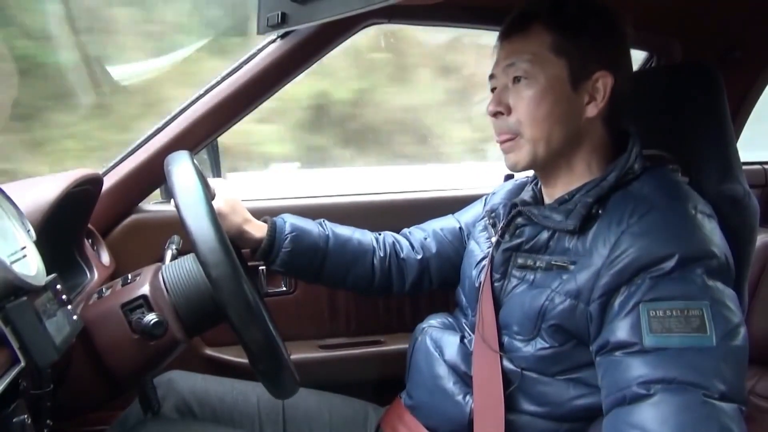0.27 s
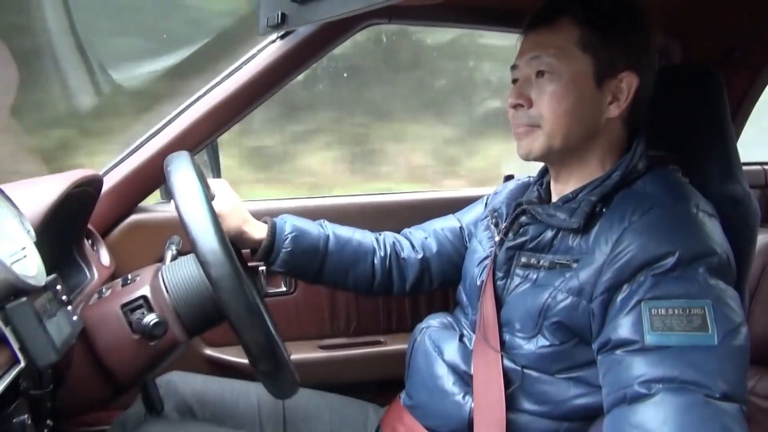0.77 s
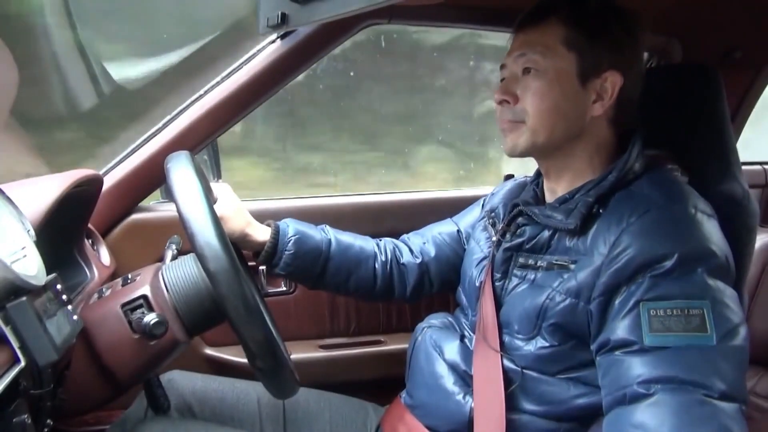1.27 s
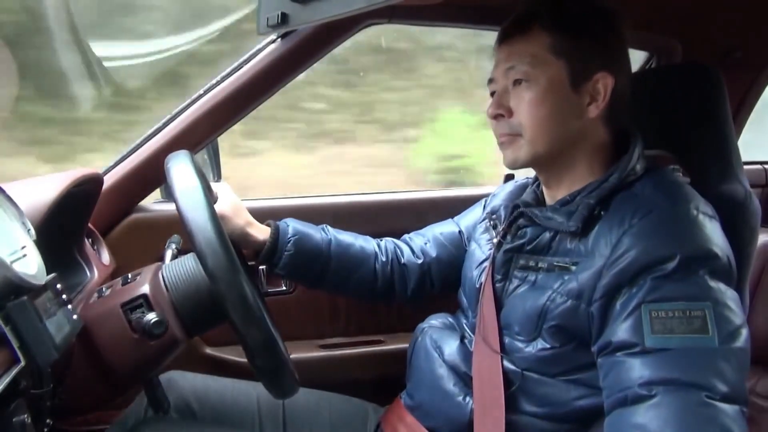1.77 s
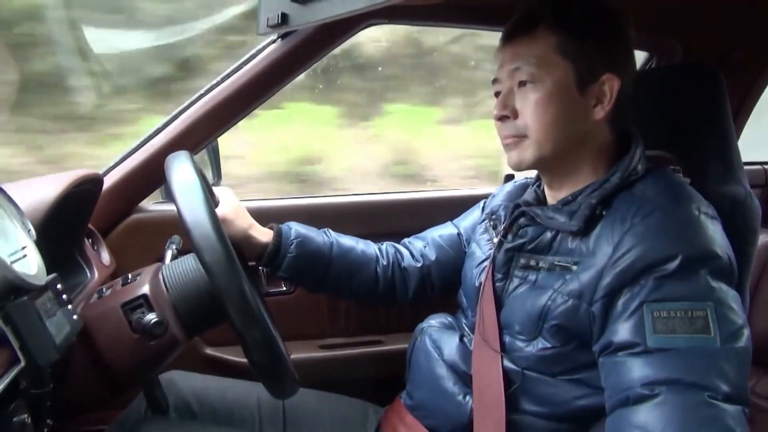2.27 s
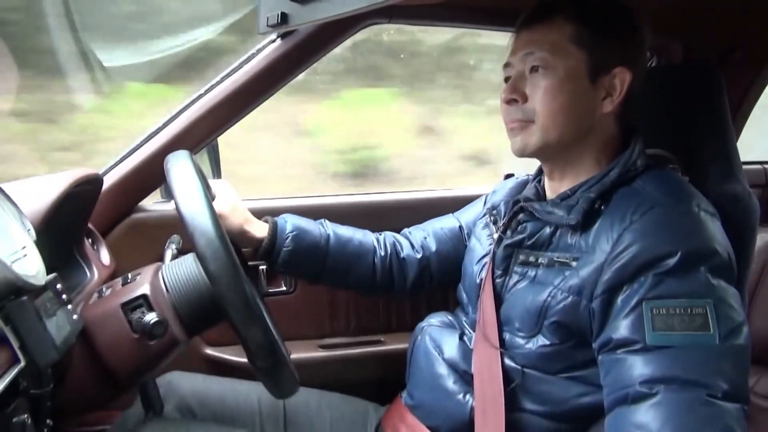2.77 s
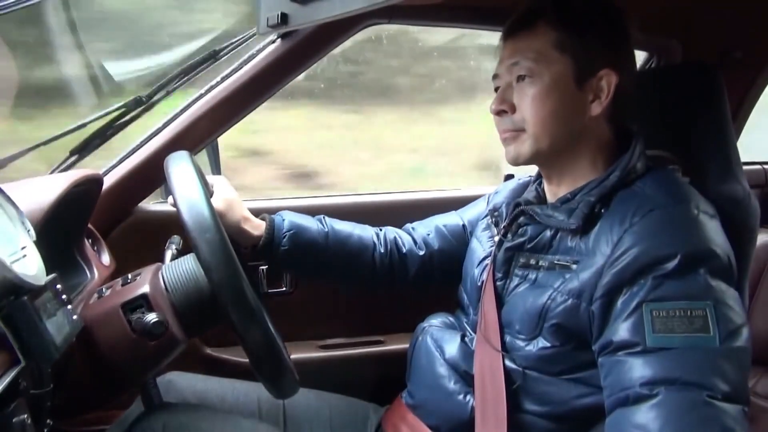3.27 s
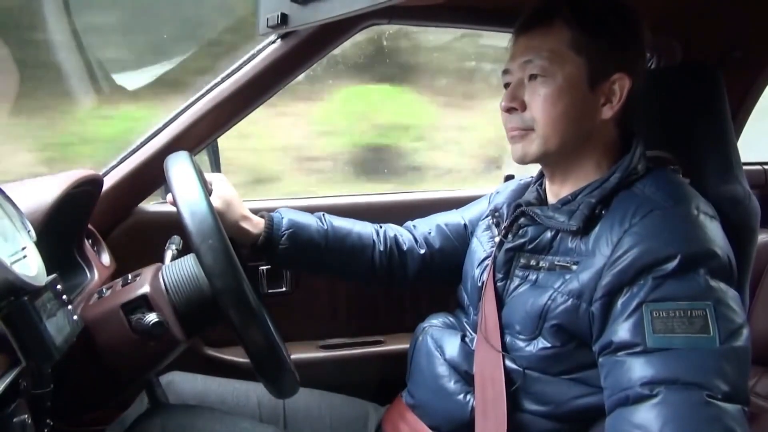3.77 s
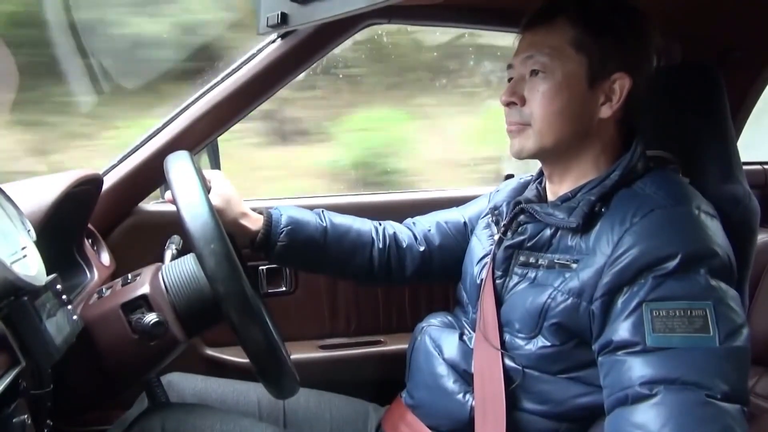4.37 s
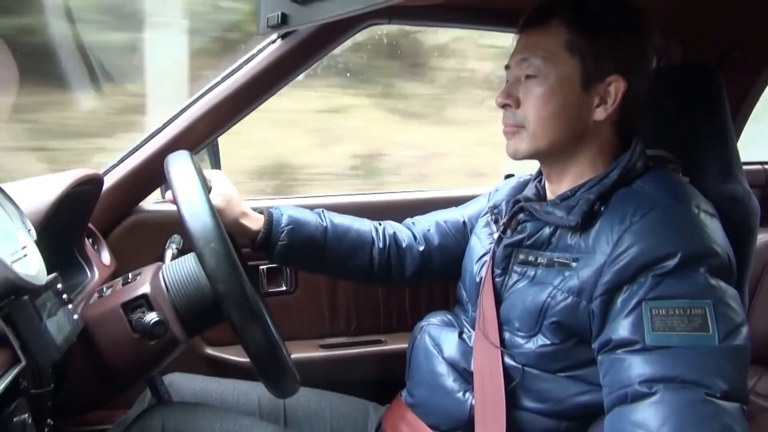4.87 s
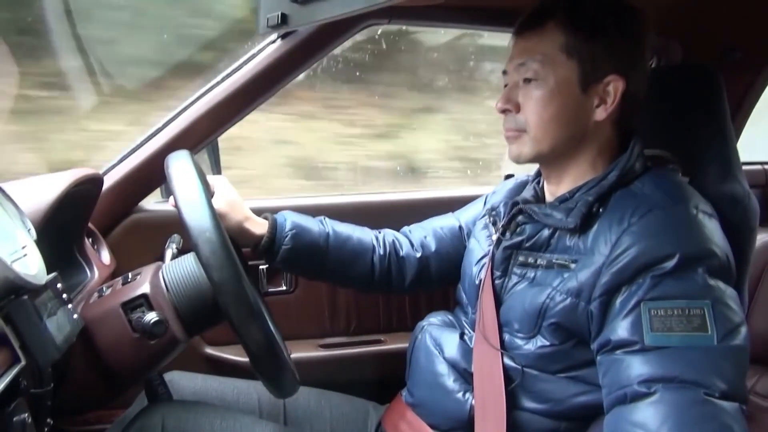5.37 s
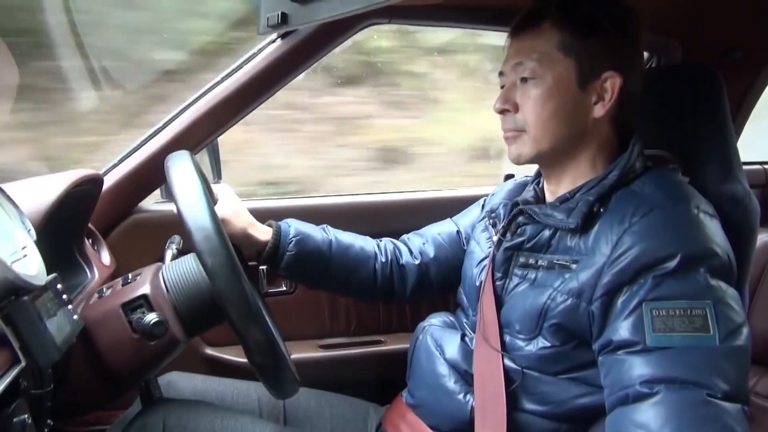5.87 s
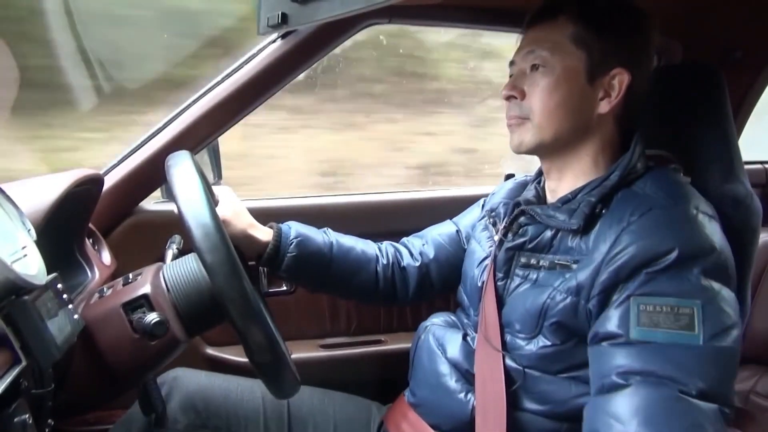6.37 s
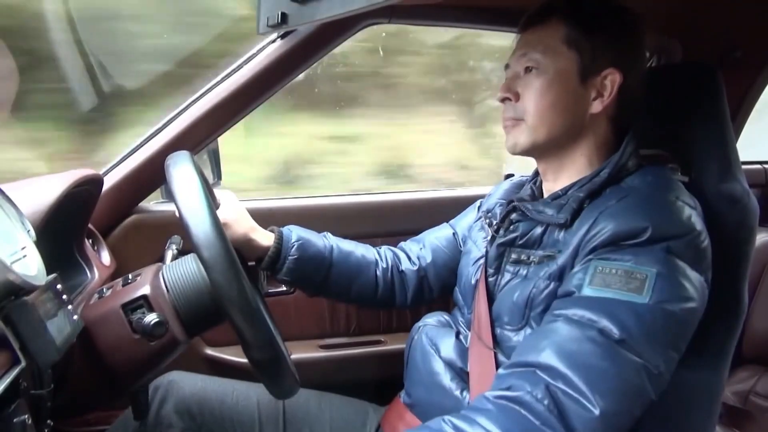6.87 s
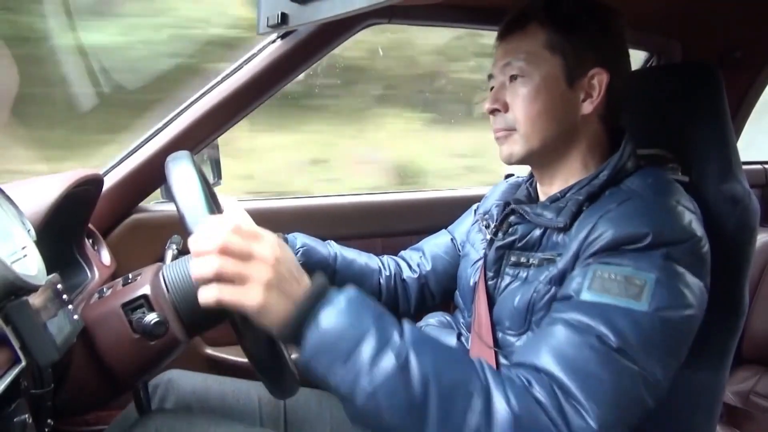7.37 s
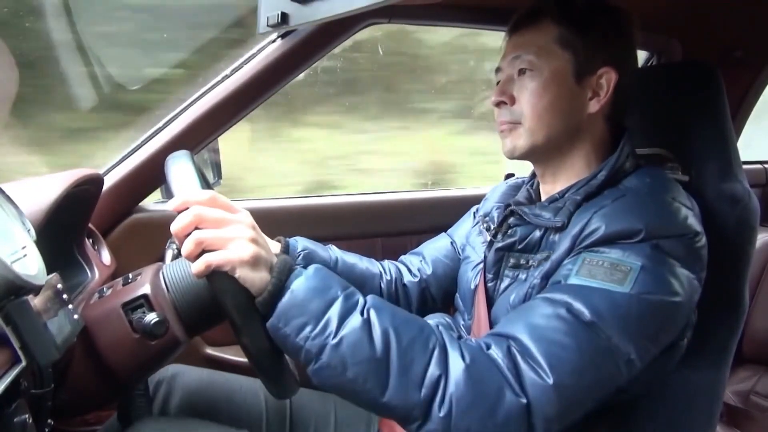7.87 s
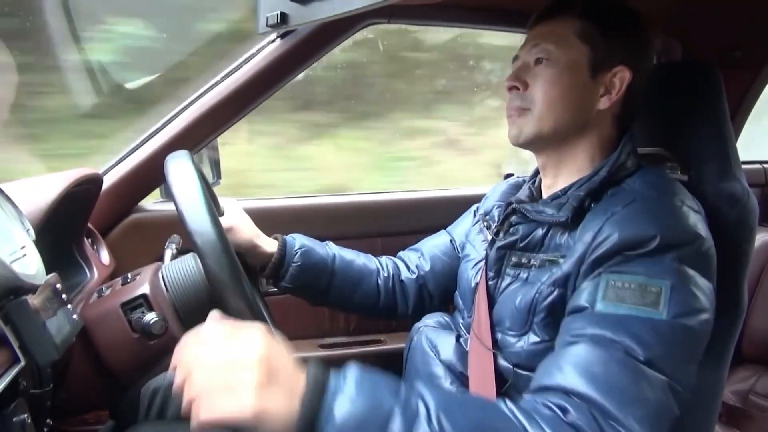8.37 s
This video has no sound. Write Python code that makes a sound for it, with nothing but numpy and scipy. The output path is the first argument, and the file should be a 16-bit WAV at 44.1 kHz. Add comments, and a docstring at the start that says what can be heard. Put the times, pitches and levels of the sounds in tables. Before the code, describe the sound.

Inside a car cabin, a turbocharged rotary engine booms and slowly rises, lifts off with a fluttering turbo and a jolt, then resumes lower and quieter.

```python
"""Turbocharged rotary car, cabin view

A booming, slowly rising firing note over road rumble and growing intake hiss: phase-locked orders plus shaped noise.
The throttle shuts, the turbo flutters in noise puffs, the drivetrain judders twice as short deep sines,
and the engine picks up at lower speed. The bass overloads the microphone amplifier, which chops the hiss at crests.
"""
import sys
import numpy as np
from scipy import signal
from scipy.fft import rfft, irfft
from scipy.io import wavfile

SR = 44100
rng = np.random.default_rng(int(sys.argv[2]) if len(sys.argv) > 2 else 0)


def file_out(sig):
    """Save sig as 16-bit WAV at sys.argv[1]."""
    # one column per channel
    cols = np.atleast_2d(sig).T
    # limit, then scale
    lim = np.clip(cols, -1, 1)
    pcm = np.round(lim * 32767).astype(np.int16)
    wavfile.write(sys.argv[1], SR, pcm)


N = 381024

# gear change: lift off, clutch bites, clutch holds, ease off again
LIFT_S, BITE_S, HOLD_S, EASE_S = 6.42, 7.05, 7.2, 7.6
# time constant of the boost loss after the lift
BLEED_S = 0.37


def amp(db):
    """Decibels to gain."""
    return 10 ** (np.asarray(db) / 20)


def unit(x):
    """Scale to rms 1."""
    return x / np.sqrt(np.mean(x ** 2) + 1e-20)


def since(start_s):
    """Seconds elapsed since the given moment, zero before it."""
    return np.maximum(np.arange(N) / SR - start_s, 0)


def curves(rows):
    """Each column of a table, joined by straight lines at every sample."""
    t_s, *columns = np.transpose(rows)
    return [np.interp(np.arange(N) / SR, t_s, column) for column in columns]


def noise(spectrum):
    """Noise of rms 1, coloured by a spectrum table on a log frequency axis."""
    hz, db = np.transpose(spectrum)
    bins_hz = np.fft.rfftfreq(N, 1 / SR)
    gain = amp(np.interp(np.log(bins_hz + 1), np.log(hz + 1), db))
    return unit(irfft(rfft(rng.standard_normal(N)) * gain, N))


def band(hz, width_hz):
    """Noise of rms 1 in one resonance; at 0 Hz it is a slow wander."""
    detune = 2 * (np.fft.rfftfreq(N, 1 / SR) - hz) / width_hz
    return unit(irfft(rfft(rng.standard_normal(N)) / (1 + detune ** 2), N))


def arch(start_s, length_s):
    """Half sine that swells and fades over the given stretch."""
    part = (np.arange(N) / SR - start_s) / length_s
    return np.maximum(np.sin(np.pi * np.clip(part, 0, 1)), 0)


def fuzzy_tone(start_s, end_s, hz, width_hz, db):
    """Narrow noise band that comes and goes."""
    return amp(db) * arch(start_s, end_s - start_s) * band(hz, width_hz)


# body rumble: t/s, level/dB
RUMBLE_LEVEL = [(0, -18.5), (1.2, -16), (1.6, -20.5), (5.6, -21), (6.4, -17), (8.64, -16)]
# body rumble spectrum: f/Hz, relative level/dB
RUMBLE_SPECTRUM = [(5, -20.5), (12, -5.5), (22, -1.5), (34, 6), (45, -1), (60, -2.5), (78, -10),
                   (110, -15.5), (200, -66.5)]
# tyre spectrum: f/Hz, relative level/dB
TYRE_SPECTRUM = [(50, -13.5), (95, 0.5), (140, 1), (200, -1), (280, -10), (420, -9.5), (560, -18),
                 (850, -22), (1150, -19.5), (1700, -30), (2400, -37), (5000, -49.5), (10800, -49)]
# tyre level at the start, and its growth until the lift
TYRE_DB, TYRE_DB_PER_S = -31, 0.41


def road(grain_db=0.6):
    """Body rumbles on its springs; tyres roll over coarse asphalt, louder as the car gains speed."""
    rumble_db, = curves(RUMBLE_LEVEL)
    tyre_db = TYRE_DB + TYRE_DB_PER_S * np.minimum(since(0), LIFT_S)
    rumble = amp(rumble_db) * noise(RUMBLE_SPECTRUM)
    tyres = amp(tyre_db + grain_db * band(0, 110)) * noise(TYRE_SPECTRUM)
    return rumble + tyres


# road bumps and drivetrain judder: start t/s, length/s, f/Hz, peak level/dB
JOLTS = [(.98, .085, 18, -4), (1.085, .05, 28, -9), (1.143, .03, 17, -2.5), (1.2, .13, 26, -14),
         (6.503, .17, 33.8, -2), (7.07, .13, 36, -2)]


def jolts():
    """Deep swings of the whole car, which start and stop quickly."""
    out = np.zeros(N)
    for start_s, length_s, hz, peak_db in JOLTS:
        swing = np.sin(2 * np.pi * hz * (np.arange(N) / SR - start_s))
        out += amp(peak_db) * np.sqrt(arch(start_s, length_s)) * swing
    return out


# loudest trim rattles: t/s, onset level/dB, f/Hz
TICKS = [(.463, -42, 5500), (6.775, -35.5, 12000), (7.235, -46, 11000), (7.745, -46, 7024),
         (7.868, -45, 5000), (8.182, -43, 9000)]
# short trim squeak: start t/s, end t/s, f/Hz, width/Hz, level/dB
SQUEAK = (6.03, 6.15, 2400, 90, -49)
# fainter random rattles: mean onset level, half range, pitch range
RATTLE_DB, RATTLE_SPREAD_DB, RATTLE_LOW_HZ, RATTLE_HIGH_HZ = -48, 2.5, 4400, 11000


def trim(t60_s=0.071, relative_width=1.0, faint_count=14):
    """Loose fittings tick as decaying noise bands, a few loudly and more of them faintly; one squeaks."""
    ticks = list(TICKS)
    for when, force, pitch in rng.random((faint_count, 3)):
        db = RATTLE_DB + RATTLE_SPREAD_DB * (2 * force - 1)
        hz = RATTLE_LOW_HZ + (RATTLE_HIGH_HZ - RATTLE_LOW_HZ) * pitch
        ticks.append((when * N / SR, db, hz))
    out = fuzzy_tone(*SQUEAK)
    for start_s, db, hz in ticks:
        age_s = np.arange(N) / SR - start_s
        decay = (age_s > 0) * np.exp(-np.log(1000) * abs(age_s) / t60_s)
        out += amp(db) * decay * band(hz, hz * relative_width)
    return out


# intake air spectrum: f/Hz, relative level/dB
HISS_SPECTRUM = [(700, -6.5), (1500, -3), (2400, -5.5), (2950, -1.5), (3350, 0), (3750, -1), (4300, -6.5),
                 (5400, -7.5), (7200, -5.5), (8200, -7.5), (9300, -4.5), (10900, -6.5), (12200, -8.5),
                 (15800, -11)]
# air singing at edges in the intake: start t/s, end t/s, f/Hz, width/Hz, level/dB
WHISTLES = [(-.8, 2.9, 6650, 140, -59), (1.1, 2.5, 7820, 200, -59), (2.3, 4, 7250, 200, -56.5),
            (3, 4.9, 8720, 200, -57), (-1.8, 7, 3320, 240, -50.5), (2.6, 4.4, 3700, 200, -53.5),
            (6.38, 6.56, 2900, 700, -46), (6.4, 8.3, 3280, 300, -56)]
# turbo spools up to its limit, loses boost at the lift, dies away while coasting
AIR_DB, SPOOL_DB_PER_S, FULL_BOOST_DB = -49.5, 2, -39
BLEED_DB, COAST_DB_PER_S = 15, 5.5


def intake(firings, throb=0.19, flicker_db=0.83):
    """Air rushes through turbo and pipes as boost builds and bleeds away, pulsing slightly with the ports."""
    boost_db = np.minimum(AIR_DB + SPOOL_DB_PER_S * since(0), FULL_BOOST_DB)
    bleed_db = BLEED_DB * (1 - np.exp(-since(LIFT_S) / BLEED_S))
    air_db = boost_db - bleed_db - COAST_DB_PER_S * since(EASE_S)
    rush = noise(HISS_SPECTRUM) * amp(air_db + flicker_db * band(0, 110))
    whistles = sum(fuzzy_tone(*row) for row in WHISTLES)
    return (rush + whistles) * (1 + throb * np.sin(2 * np.pi * firings))


# surge puff spectrum: f/Hz, relative level/dB
PUFF_SPECTRUM = [(600, 8), (2000, 2), (3400, -4), (5000, -10), (6700, -4.5), (7550, 3), (8300, -3),
                 (10800, -5), (13000, -6), (15800, -3.5)]
# compressor surge: centre of first puff, even spacing, puff length, first level, loss per puff
SURGE_S, PUFF_GAP_S, PUFF_S, PUFF_DB, PUFF_FADE_DB = 6.43, .0703, 0.073, -33.5, 1.35


def flutter(count=8):
    """Trapped boost escapes backwards through the compressor in evenly spaced, fading puffs."""
    envelope = np.zeros(N)
    for k in range(count):
        start_s = SURGE_S + k * PUFF_GAP_S - PUFF_S / 2
        envelope += amp(PUFF_DB - k * PUFF_FADE_DB) * arch(start_s, PUFF_S) ** 2
    return noise(PUFF_SPECTRUM) * envelope


def random_reverb(x, t60_s=0.1, wet=.3):
    """Short random decaying reverb, mixed in weakly, roughens the hiss spectrum."""
    t_s = np.arange(SR // 10) / SR
    tail = rng.standard_normal(len(t_s)) * np.exp(-np.log(1000) * t_s / t60_s)
    return x + wet * signal.oaconvolve(x, tail / np.linalg.norm(tail))[:N]


# pull: the firing rate climbs ever faster until the lift
START_HZ, CLIMB_HZ_PER_S, CLIMB_HZ_PER_S2 = 93.95, 3.6, .262
# run-down time constant of the free engine, rate in the next gear, slowing while coasting
RUN_DOWN_S, NEXT_GEAR_HZ, SAG_HZ_PER_S = 1.5, 99.3, 5.5


def clutch():
    """How firmly the next gear holds the engine, from 0 to 1."""
    return np.minimum(since(BITE_S) / (HOLD_S - BITE_S), 1)


def firing_rate():
    """Engine climbs under power, runs down freely, and is caught by the next gear."""
    pull_s = np.minimum(since(0), LIFT_S)
    pull_hz = START_HZ + CLIMB_HZ_PER_S * pull_s + CLIMB_HZ_PER_S2 * pull_s ** 2
    free_hz = pull_hz * np.exp(-since(LIFT_S) / RUN_DOWN_S)
    geared_hz = NEXT_GEAR_HZ - SAG_HZ_PER_S * since(EASE_S)
    return free_hz + clutch() * (geared_hz - free_hz)


# engine load against full throttle: t/s, level/dB
THROTTLE = [(0, -2.5), (.5, 0), (6.39, 0), (6.52, -21.5), (6.8, -12.5), (7.13, -15), (7.28, -4), (7.68, -5),
            (7.87, -14), (8.64, -16)]


def engine_load():
    """Engine load in dB, set by the throttle."""
    load_db, = curves(THROTTLE)
    return load_db


# eccentric shaft in the higher gear: level, build-up time
SHAKE_DB, SHAKE_RISE_S = -22, .08


def shaft(firings, firings_per_turn=3, rough=0.21):
    """Shaft turns once in three firings and shakes the lightly loaded car once the next gear holds."""
    settled = np.minimum(since(HOLD_S) / SHAKE_RISE_S, 1)
    swing = np.sqrt(2) * np.sin(2 * np.pi * firings / firings_per_turn)
    return amp(SHAKE_DB) * settled * swing * (1 + rough * band(0, 11))


# exhaust roar spectrum: f/Hz, relative level/dB
ROAR_SPECTRUM = [(90, -17), (170, -4), (260, 1), (400, -5), (600, -8), (900, -17.5), (1500, -23),
                 (2500, -30), (6000, -59)]
# roar at START_HZ and full load, growth with firing rate, share of the load dB followed
ROAR_DB, ROAR_DB_PER_OCTAVE, ROAR_LOAD_SHARE = -40.5, 25, 0.74
# rasp near full boost: onset, swell time, pipe resonance, level at full load
RASP_S, RASP_RISE_S, RASP_HZ, RASP_WIDTH_HZ, RASP_DB = 4.44, .8, 264, 130, -28


def exhaust(firings, firing_hz, load_db, throb=0.25):
    """Turbulent gas leaves in one puff per firing, louder with speed and load; rasps near full boost."""
    speed_db = ROAR_DB_PER_OCTAVE * np.log2(firing_hz / START_HZ)
    roar = amp(ROAR_DB + speed_db + ROAR_LOAD_SHARE * load_db) * noise(ROAR_SPECTRUM)
    boosted = np.minimum(since(RASP_S) / RASP_RISE_S, 1) * np.exp(-since(LIFT_S) / BLEED_S)
    rasp = amp(RASP_DB + load_db) * boosted * band(RASP_HZ, RASP_WIDTH_HZ)
    return (roar + rasp) * (1 + throb * np.cos(2 * np.pi * firings))


# cabin resonances crossed by orders 2-4: f/Hz, width/Hz, level/dB
CABIN_MODES = [(198.3, 22, 0.5), (227.9, 27, -1.5), (302, 26.3, -2), (367, 44, 1), (401.3, 10.7, 6),
               (432, 30.5, 14), (468.7, 20, 13)]


def cabin_gain(hz, between_db=-24):
    """How strongly the cabin resonances carry a tone of this pitch, over a floor between them."""
    gain = amp(between_db)
    for centre_hz, width_hz, db in CABIN_MODES:
        gain = gain + amp(db) / (1 + (2 * (hz - centre_hz) / width_hz) ** 4)
    return gain


# orders 2, 3, 4 at full throttle, before growl_db and cabin_gain: level/dB
OVERTONE_DB = [-24.5, -29, -43.5]
# cabin response to orders 5-9, against the firing note before boom_db: f/Hz, level/dB
HIGH_ORDER_CABIN = [(470, -46), (525, -28), (565, -28), (615, -31.5), (660, -47), (800, -43), (1100, -57)]
# firing note at START_HZ and full load before boom_db, growth with rate, share of the load dB followed
NOTE_DB, NOTE_DB_PER_OCTAVE, NOTE_LOAD_SHARE = -19, 18, 0.77


def engine_note(firings, firing_hz, load_db, boom_db=2.0, growl_db=-2.0, wobble=0.032, rough=0.15):
    """Orders of the firing rate: a steady boom, and less steady overtones coloured by the cabin."""
    def order(k):
        return -np.sqrt(2) * np.cos(2 * np.pi * k * firings - np.pi / 4)

    speed_db = NOTE_DB_PER_OCTAVE * np.log2(firing_hz / START_HZ)
    note_db = NOTE_DB + speed_db + NOTE_LOAD_SHARE * load_db
    out = amp(note_db + boom_db) * order(1) * (1 + wobble * band(0, 50))
    gains = [amp(db + load_db + growl_db) * cabin_gain(k * firing_hz) for k, db in enumerate(OVERTONE_DB, 2)]
    cabin_hz, cabin_db = np.transpose(HIGH_ORDER_CABIN)
    gains += [amp(note_db + np.interp(k * firing_hz, cabin_hz, cabin_db)) for k in range(5, 10)]
    for k, gain in enumerate(gains, 2):
        out += gain * order(k) * (1 + rough * band(0, 25))
    return out


def scene():
    """Everything that reaches the passenger seat."""
    firing_hz = firing_rate()
    load_db = engine_load()
    jitter = 0.0014 * band(0, 30.8)
    firings = np.cumsum(firing_hz * (1 + jitter)) / SR  # running count, the phase of all engine sounds
    background = road() + jolts() + trim()
    turbo = random_reverb(intake(firings) + flutter())
    engine = shaft(firings) + exhaust(firings, firing_hz, load_db) + engine_note(firings, firing_hz, load_db)
    return (background + turbo + engine)[None]


# treble limit of the output, soft fall from 11 kHz, steep cut at 16 kHz: f/Hz, gain/dB
TREBLE_LIMIT = [(0, 0), (11000, 0), (12500, -6), (15800, -14), (16000, -100), (22050, -100)]


def record(dry, ceiling_db=-9.0, coupling_hz=16, knee=14, full_scale=.49):
    """Input stage clips; two coupling capacitors make each flat top sag; then the treble is limited."""
    x = dry / (1 + abs(dry / amp(ceiling_db)) ** knee) ** (1 / knee)
    b, a = signal.butter(1, coupling_hz, "highpass", fs=SR)
    x = signal.lfilter(b, a, signal.lfilter(b, a, x))
    x = np.clip(x, -full_scale, full_scale)
    hz, db = np.transpose(TREBLE_LIMIT)
    lowpass = signal.firwin2(511, hz, amp(db), window="blackman", fs=SR)
    return signal.oaconvolve(x, lowpass[None], "same")


dry = scene()
out = record(dry)
file_out(out)
```